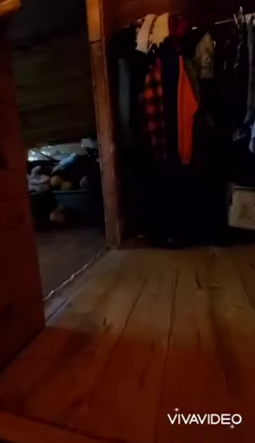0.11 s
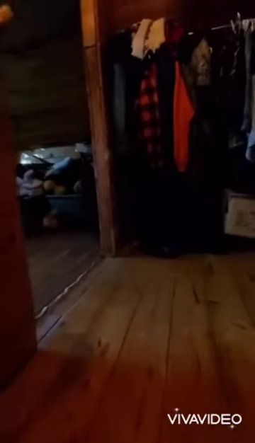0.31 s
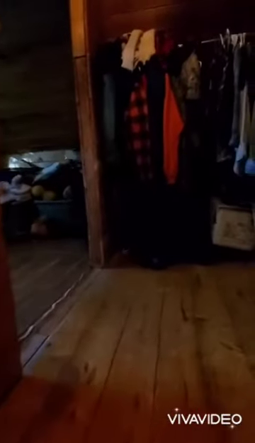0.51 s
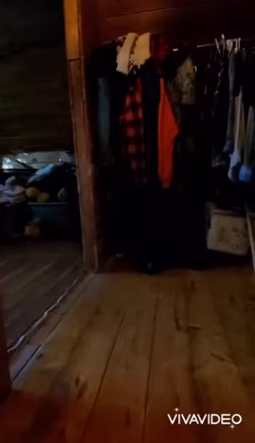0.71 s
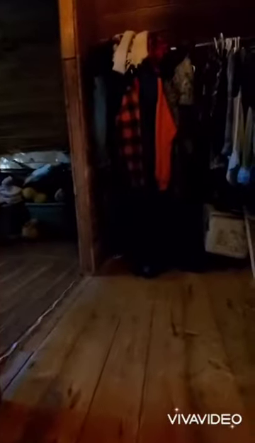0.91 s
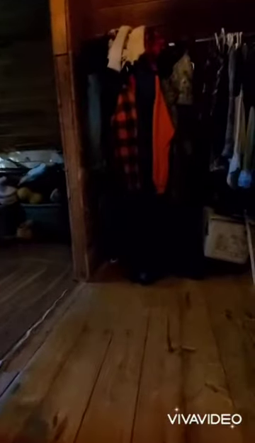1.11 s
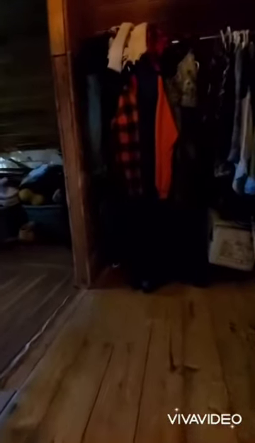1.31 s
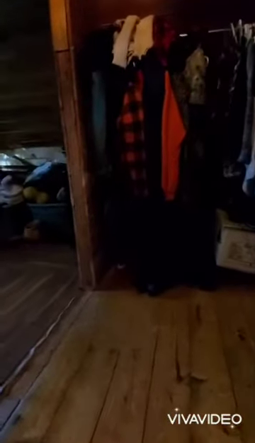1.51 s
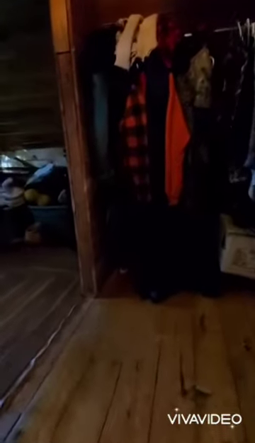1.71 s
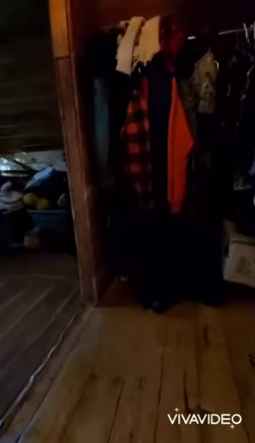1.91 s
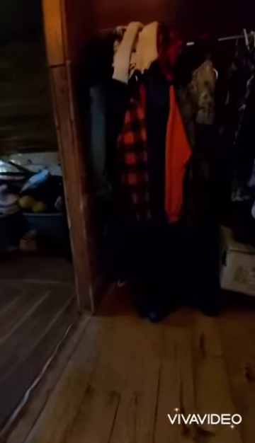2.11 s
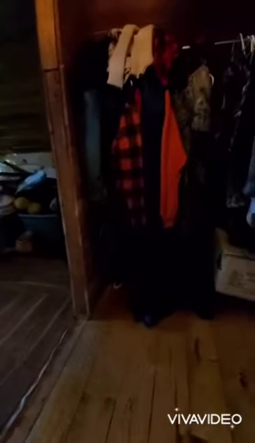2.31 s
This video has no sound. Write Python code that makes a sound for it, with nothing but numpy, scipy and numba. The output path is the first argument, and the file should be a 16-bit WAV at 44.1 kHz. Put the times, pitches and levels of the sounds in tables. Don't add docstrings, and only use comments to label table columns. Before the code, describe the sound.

Shoes clatter and scrape across a timber floor indoors, boards thumping and creaking over a faint hum

```python
import sys
import numpy as np
from scipy import signal
from scipy.fft import rfft, irfft
from scipy.io import wavfile
from scipy.ndimage import uniform_filter1d
from numba import njit

SR = 44100
rng = np.random.default_rng(int(sys.argv[2]) if len(sys.argv) > 2 else 0)


def natural_amplitude(level_db):
    exponent = np.asarray(level_db, float) / 20
    return 10 ** exponent


def generate_wav(signal):
    frames = np.transpose(np.atleast_2d(signal))
    scaled = np.clip(frames, -1, 1) * 32767
    pcm = np.round(scaled).astype(np.int16)
    wavfile.write(sys.argv[1], SR, pcm)


N = 110250
T = np.arange(N) / SR


def unit(x):
    return x / np.sqrt(np.mean(x ** 2))


def energy(x, db):
    return x * natural_amplitude(db) / np.sqrt(np.sum(x ** 2))


def split(x, kind, hz, order=3):
    return signal.sosfilt(signal.butter(order, hz, kind, fs=SR, output="sos"), x)


def read(table, hz, axis=1):
    table = np.array(table, float)
    return np.interp(np.log(np.maximum(hz, 1)), np.log(table[:, 0]), table[:, axis])


def colour(x, table):
    size = 8192
    cepstrum = irfft(read(table, np.arange(size // 2 + 1) * SR / size) * np.log(10) / 20)
    cepstrum[1:size // 2] *= 2
    cepstrum[size // 2 + 1:] = 0
    response = irfft(np.exp(rfft(cepstrum)))[:size // 2]
    return signal.fftconvolve(x, response / np.sqrt(np.sum(response ** 2)))[:len(x)]


def even(x, width_hz):
    size = 2 * x.shape[-1]
    spectrum = rfft(x, size)
    bins = int(width_hz * size / SR) + 1
    power = uniform_filter1d(np.abs(spectrum) ** 2, size=bins, axis=-1)
    return irfft(spectrum / np.sqrt(power + 1e-18))[..., :size // 2]


@njit
def svf(x, hz, width):
    y, band, low = np.empty(len(x)), 0., 0.
    for i in range(len(x)):
        g, k = np.tan(np.pi * hz[i] / SR), width / hz[i]
        v = (band + g * (x[i] - low)) / (1 + g * (g + k))
        band, low, y[i] = 2 * v - band, low + 2 * g * v, k * v
    return y


def walk(rate):
    k = int(SR / rate)
    held = np.repeat(rng.standard_normal(N // k + 1), k)
    return 1.3 * uniform_filter1d(uniform_filter1d(held, k), k)[:N]


PORT_LAG_S = .00042


def late(x):
    return np.array([np.roll(x, int(round(PORT_LAG_S * SR))), x])


# f/Hz, time to fall 60 dB [s], share common to both ports [0-1]
ROOM_DECAY = [(80, .4, .98), (250, .28, .85), (700, .2, .9), (2000, .17, .5), (5000, .125, .3),
              (12000, .075, .1)]


def pair(band, hz):
    share = np.clip(read(ROOM_DECAY, hz, axis=2), 0, 1)
    common = late(band())
    return np.sqrt(share) * common + np.sqrt(1 - share) * np.array([band(), band()])


# f/Hz, level/dB
HOUSE_NOISE = [(15, -58), (25, -30), (41, -27), (64, -1), (185, -11.5), (1190, -17.5), (1750, -59),
               (3200, -26), (8000, -36.5), (10400, -81), (17600, -120)]
# f/Hz, width [Hz], level/dB
HUM_BANDS = [(65.3, 8.6, -49.5), (1234, 230, -57.5), (2100, 220, -80), (3156, 210, -65.5)]
HOUSE_DB, HOUSE_FADE_DB_S, FLICKER_DB = -52.5, -1.5, 5


def house():
    noise = 0
    for hz in 30 * 2 ** np.arange(0, 8.3, .5):
        centre = np.full(N, hz)
        band = lambda: svf(svf(rng.standard_normal(N), centre, hz / 2), centre, hz / 2)
        noise = noise + natural_amplitude(read(HOUSE_NOISE, hz) + FLICKER_DB * walk(8.2)) * pair(band, hz)
    noise = unit(noise) * natural_amplitude(HOUSE_DB)
    for hz, width, db in HUM_BANDS:
        band = lambda: unit(svf(rng.standard_normal(N), np.full(N, 1. * hz), 1. * width))
        noise = noise + natural_amplitude(db + 0.61 * walk(6.35)) * pair(band, hz)
    return noise * natural_amplitude(HOUSE_FADE_DB_S * (T - 0.5))


PORT_HISS_DB, PORT_HISS_HZ = -69.5, 10100
FLOOR_GAP_HZ, FLOOR_GAP_WIDTH_HZ, FLOOR_GAP_DB = 8050, 600, -24


def background():
    hiss = split(rng.standard_normal((2, N)), "high", PORT_HISS_HZ, order=4)
    hz = np.arange(N // 2 + 1) * SR / N
    gap = FLOOR_GAP_DB * np.exp(-((hz - FLOOR_GAP_HZ) / FLOOR_GAP_WIDTH_HZ) ** 4)
    return irfft(rfft(house() + natural_amplitude(PORT_HISS_DB) * hiss) * natural_amplitude(gap), N)


BUILD_UP_S, PATCHY_DB = 0.0015, 1.8


def room(x, direct_db):
    t, echoes = T[:SR // 2], 0
    for hz in 170 * 2 ** np.arange(0, 6.8, .5):
        band = lambda: unit(svf(rng.standard_normal(len(t)), np.full(len(t), hz), hz / 1.52))
        tail = (1 - np.exp(-t / BUILD_UP_S)) * 1000. ** (-t / read(ROOM_DECAY, hz))
        echoes = echoes + pair(band, hz) * tail * np.sqrt(hz / np.sum(tail ** 2))
    echoes = energy(even(echoes * natural_amplitude(PATCHY_DB * walk(700)[:len(t)]), 90.), 3)
    return signal.fftconvolve(x[None], echoes, axes=1)[:, :N] + natural_amplitude(direct_db) * late(x)


# t/s, f/Hz, rise [Hz per s], level/dB
CREAK_EVENTS = [(.366, 740, 600, -34), (.455, 320, -600, -33), (.41, 400, 0, -40), (1.15, 590, 0, -41),
                (1.158, 790, 0, -41), (1.235, 2750, 0, -48), (1.275, 2400, 0, -47), (1.345, 1300, 0, -41),
                (1.355, 345, 0, -35), (1.3, 150, 300, -36), (1.36, 170, 0, -36), (1.42, 140, 0, -37),
                (1.905, 170, 0, -39), (2.14, 145, 0, -46), (1.815, 335, 0, -36), (2.192, 400, 6000, -44)]
CREAK_HALF_S, CREAK_WAVER, CREAK_SWELL_DB = .019, .04, 3


def creaks():
    waver, swell = 1 + CREAK_WAVER * walk(120), natural_amplitude(CREAK_SWELL_DB * walk(90))
    out = np.zeros(N)
    for s, hz, rise, db in CREAK_EVENTS:
        phase = 2 * np.pi * np.cumsum((hz + rise * (T - s)) * waver) / SR
        out += natural_amplitude(db) * np.sqrt(2) * np.sin(phase) * np.exp(-((T - s) / CREAK_HALF_S) ** 2)
    return swell * out


# t/s, level/dB, f/Hz, ringing [cycles]
TICK_EVENTS = [(0.207, -15, 2640, 3.8), (.359, -13, 704, 6.3), (0.382, -3.5, 1660, 7.7), (.404, -8, 660, 7),
               (.428, -3, 1610, 5.3), (.457, -2, 910, 5.3), (.497, -12, 2500, 1.7),
               (0.679, -19.5, 2570, 1.3), (.894, -10.5, 2550, 1.9), (.898, -8.5, 700, 3.3),
               (1.114, -10.5, 1180, 2.9), (1.115, -10, 595, 3), (1.143, -3, 780, 5.2),
               (1.222, -18, 4570, 5.5), (1.291, -19, 5160, 3), (1.401, -13, 4960, 0.67),
               (0.212, -14, 5000, 2.2), (0.687, -14, 4660, 4.3), (.905, -12.5, 4970, 1.3),
               (.905, -3, 2620, 5.6), (.688, -1.5, 2650, 5.4), (.213, -3.5, 2530, 6),
               (1.252, -4, 2800, 1.9), (1.284, -19, 2380, 3.7), (1.302, -5, 910, 2.3),
               (1.313, -5, 1320, 3.6), (1.329, -8.5, 2770, 6.7), (1.341, 2, 1330, 7.2),
               (1.359, -13, 2740, 2.1), (1.37, -4, 696, 2.2), (1.403, -4.5, 2400, 2.1),
               (1.406, -0.5, 610, 5.1), (1.786, -12, 2430, 3), (1.797, 4, 950, 4), (1.88, -17, 2500, 1),
               (1.891, -6, 715, 1.9), (2.076, -12.5, 980, 2.8), (2.095, -14, 2770, 7.4),
               (2.178, -10.5, 327, 1.3)]


def ticks():
    out, t = np.zeros(N + SR), T[:SR // 20]
    for s, db, hz, cycles in TICK_EVENTS:
        i = int(s * SR)
        click = np.sin(2 * np.pi * hz * t) * np.exp(-t * hz * 4.6 / max(cycles, 1))
        out[i:i + len(t)] += energy(click, db)
    return out[:N]


GRAINS_PER_S, GRAIN_SPREAD_DB = 450, 4


def grains():
    chance, sign, size = rng.random((3, N))
    clicks = (chance < GRAINS_PER_S / SR) * np.sign(sign - .5) * natural_amplitude(-GRAIN_SPREAD_DB * np.log(1 - size))
    power = uniform_filter1d(uniform_filter1d(clicks ** 2, size=660), size=330).clip(0)
    return unit(clicks / np.sqrt(power + 1e-4))


def pressure(curve, axis=0):
    c = np.array(curve, float)
    db = c[:, 1] + (c[:, axis] if axis else 0)
    return uniform_filter1d(natural_amplitude(np.interp(T, c[:, 0], db, left=-200, right=-200)), size=150)


# t/s, pressure level/dB, squeak f/Hz
SCUFF_CURVE = [
    (2.066, -63, 1080),
    (2.092, -47, 1250),
    (2.1, -21.5, 1370),
    (2.109, -19, 1567),
    (2.115, -21.5, 2035),
    (2.125, -29, 2103),
    (2.139, -35, 2106),
    (2.17, -52, 2010),
    (2.2, -58, 1720),
]
# multiple of its pitch [ratio], level/dB
SQUEAK_STREAKS = [(.68, -9), (1., 2), (1.5, -9), (2.2, -15)]
# f/Hz, level/dB per Hz
TWIST_COLOUR = [(120, -42), (200, -7), (1140, 6), (1350, -9), (2250, -26), (2470, -3), (9580, -23),
                (14100, -38), (16000, -71)]
SCUFF_DB, SCUFF_HISS_DB, SQUEAK_WIDTH_HZ = 0, -9, 240.


def scuff():
    friction = 0.14 * grains() + rng.standard_normal(N)
    curve = np.array(SCUFF_CURVE, float)
    hz = np.interp(T, curve[:, 0], curve[:, 2])
    squeak = np.zeros(N)
    for k, db in SQUEAK_STREAKS:
        streak = svf(svf(friction, k * hz, SQUEAK_WIDTH_HZ), k * hz, SQUEAK_WIDTH_HZ)
        squeak += natural_amplitude(db + 2.4 * walk(59.87)) * unit(streak)
    hiss = unit(colour(friction, TWIST_COLOUR))
    return pressure(SCUFF_CURVE) * (natural_amplitude(SCUFF_DB) * squeak + natural_amplitude(SCUFF_HISS_DB) * hiss)


# f/Hz, level/dB, time to fall 60 dB [s]
BOARD_TONES = [(59, -30, 0.3), (107, -8, 0.25), (135, -2, 0.28), (175, -2, 0.24), (200.8, 2, 0.2),
               (244, -1, 0.17), (318.4, 1, 0.17), (343, -1, 0.13), (390, 1, 0.13), (478, 4, 0.15),
               (520, 4, 0.15), (583, -4, 0.1), (716, -5, 0.09), (795, -7, 0.08)]
THUMP_OCTAVES = 1.2


def ring(scatter_db, centre_hz):
    t, out = T[:SR // 3], 0
    for (hz, db, t60), scatter in zip(BOARD_TONES, scatter_db):
        level = db + scatter - 7.8 * (np.log2(hz / centre_hz) / THUMP_OCTAVES) ** 2
        out = out + natural_amplitude(level) * np.sin(2 * np.pi * hz * t) * 1000. ** (-t / max(t60, .01))
    return energy(out, 0)


# t/s, pressure level/dB, grit level/dB and board rumble level/dB (both relative to pressure)
SLIDE_CURVES = [
    [(.33, -46, -37, -17), (.375, -32.5, -23, -12), (.43, -28.5, -25, -3.5), (.465, -30, -20, 1.5),
     (.478, -43, -17, 22)],
    [(1.125, -31.5, -26.5, -4), (1.163, -39, -19.5, 1), (1.19, -77, -26, -19)],
    [(1.19, -36, -20, -20), (1.225, -31, -17.5, -9), (1.27, -28, -17, -6.5), (1.33, -29, -18, -11),
     (1.368, -26, -23.5, -2.5), (1.382, -48, 1, -7)],
]
RUB_EDGES = [2150, 1900, 3200]
# f/Hz, level/dB per Hz
RUB_COLOUR = [(180, -39), (300, -2), (1280, 0.5), (2000, -14.5), (2440, -17), (5430, -32), (8220, -40),
              (14500, -47.5), (16000, -45)]
RUB_DB, RUB_BOARD_DB, GRIT_DB, GRIT_HZ = 2.5, -0.5, 7.5, 3300


def slides():
    friction = grains() * natural_amplitude(2.54 * walk(60.))
    grit = sum(pressure(c, axis=2) for c in SLIDE_CURVES)
    rumble = sum(pressure(c, axis=3) for c in SLIDE_CURVES)
    coloured = colour(friction, RUB_COLOUR)
    rub = sum(pressure(c) * split(coloured, "low", hz) for c, hz in zip(SLIDE_CURVES, RUB_EDGES))
    air = natural_amplitude(RUB_DB) * rub + natural_amplitude(GRIT_DB) * grit * unit(split(coloured, "high", GRIT_HZ))
    boards = signal.fftconvolve(friction * rumble, ring(np.zeros(len(BOARD_TONES)), 235.0))[:N]
    return air, natural_amplitude(RUB_BOARD_DB) * boards


# t/s, knock level/dB, board thump level/dB, sole snap level/dB, thump centre f/Hz
STEP_EVENTS = [(0.211, -17, -29.5, -34, 223), (0.305, -23, -34.5, -45.5, 215),
               (0.496, -17, -25.5, -37.5, 226), (0.686, -15.5, -27, -34.5, 307),
               (0.903, -13.5, -25, -33.5, 312), (1.116, -29.5, -69, -51.5, 330),
               (1.404, -17.5, -34.5, -51, 308), (1.641, -55, -40, -60, 146),
               (1.79, -14.5, -36.5, -35.5, 320), (1.883, -17.5, -41.5, -38, 177),
               (2.014, -43, -51.5, -57, 270), (2.175, -36, -39.5, -51.5, 278), (2.386, -72, -91, -59, 310)]
# f/Hz, level/dB per Hz
KNOCK_COLOUR = [(220, -19), (450, 0), (730, -1), (1100, -1), (1900, -13.5), (2750, -21), (4200, -30.5),
                (16000, -56)]
KNOCK_DB, BOARD_DB, SNAP_DB, SNAP_HZ, RING_SCATTER_DB = 25, 33.5, 28.5, 3520, 4.5
CONTACT_S, SOFT_CONTACT_S = .005, .007


def steps():
    knock, snap, boards = np.zeros((3, N + SR))
    t = T[:SR // 10]
    rattles = rng.standard_normal((len(STEP_EVENTS), len(t))) ** 3
    scatters = RING_SCATTER_DB * rng.standard_normal((len(STEP_EVENTS), len(BOARD_TONES)))
    for (s, db, thump_db, snap_db, hz), rattle, scatter in zip(STEP_EVENTS, rattles, scatters):
        i = int(s * SR)
        blow = even(rattle * np.exp(-t / CONTACT_S), 190.0)
        push = even(rattle * t * np.exp(-t / SOFT_CONTACT_S), 55.0)
        knock[i:i + len(t)] += energy(blow, db)
        snap[i:i + len(t)] += energy(blow, snap_db)
        rung = signal.fftconvolve(push, ring(scatter, hz))
        boards[i:i + len(rung)] += energy(rung, thump_db)
    dull = split(colour(knock, KNOCK_COLOUR), "low", SNAP_HZ)
    bright = unit(split(colour(snap, KNOCK_COLOUR), "high", SNAP_HZ)) * np.std(snap)
    air = natural_amplitude(KNOCK_DB) * dull + natural_amplitude(SNAP_DB) * bright
    return air[:N], natural_amplitude(BOARD_DB) * boards[:N]


DIRECT_DB, RUB_DRY_DB, SCUFF_WET_DB, THUMP_WET_DB = -11, -6, -5, -9
RUMBLE_CUT_HZ = 91


def scene():
    knocks, thumps = steps()
    rubs, rumble = slides()
    wet = room(knocks + ticks() + natural_amplitude(THUMP_WET_DB) * (thumps + rumble), DIRECT_DB)
    wet = wet + room(rubs, RUB_DRY_DB)
    wet = wet + natural_amplitude(SCUFF_WET_DB) * room(scuff(), -SCUFF_WET_DB - 6.0)
    boards = split(thumps + rumble + creaks(), "high", RUMBLE_CUT_HZ)
    return wet + late(boards) + background()


def roll_off(x):
    return signal.sosfilt(signal.butter(12, 16460, fs=SR, output="sos"), x)


# f/Hz, left minus right level/dB
PORT_BALANCE = [(60, 1), (110, -1.5), (200, -0.5), (380, -1), (700, 2.5), (1290, -1.5), (2380, 3),
                (4400, 7), (8120, 5.5), (15000, 8.5)]
# f/Hz, width [Hz], level/dB
CASE_COLOUR = [(2750, 300, 3), (3900, 400, -4.5), (4950, 400, 3.5)]
NOTCH_HZ, NOTCH_WIDTH_HZ, NOTCH_DB, TOP_HZ = 7790, 720, -5.5, 15400


def record(dry):
    hz = np.arange(N // 2 + 1) * SR / N
    db = read(PORT_BALANCE, hz) * np.array([[.5], [-.5]])
    db = db + NOTCH_DB * np.exp(-((hz - NOTCH_HZ) / NOTCH_WIDTH_HZ) ** 2)
    db = db + sum(d * np.exp(-((hz - f) / w) ** 2) for f, w, d in CASE_COLOUR)
    x = irfft(rfft(dry) * natural_amplitude(db), N)
    x = signal.sosfilt(signal.ellip(8, .2, 60, TOP_HZ, fs=SR, output="sos"), x)
    return roll_off(x)


dry = scene()
out = record(dry)
generate_wav(out)
```